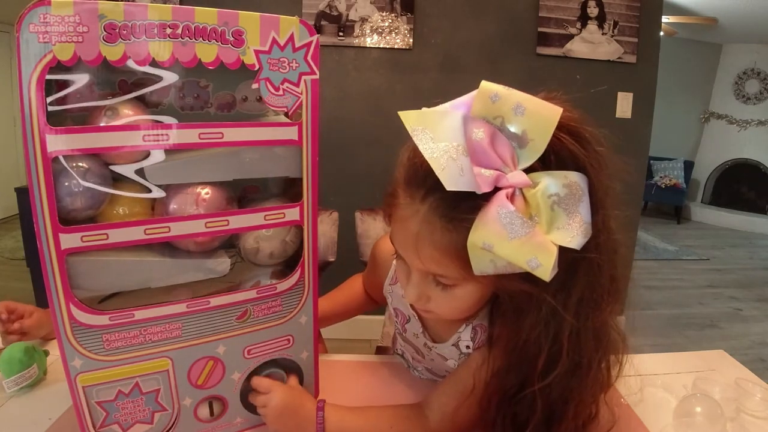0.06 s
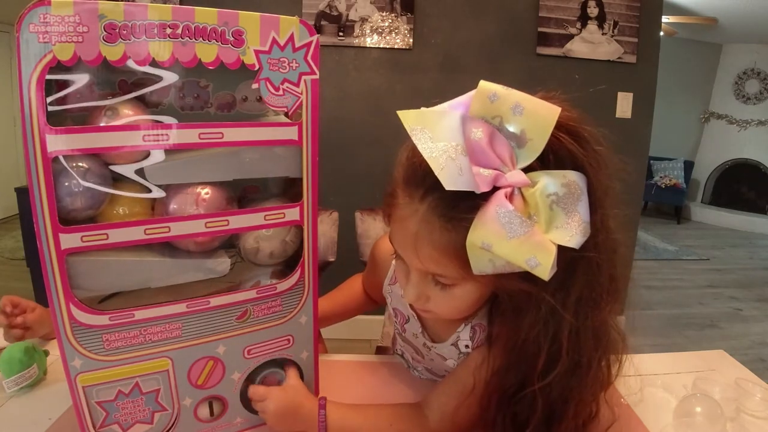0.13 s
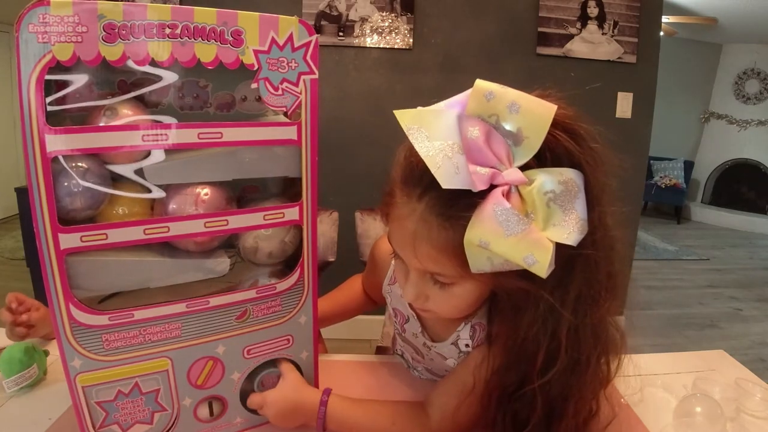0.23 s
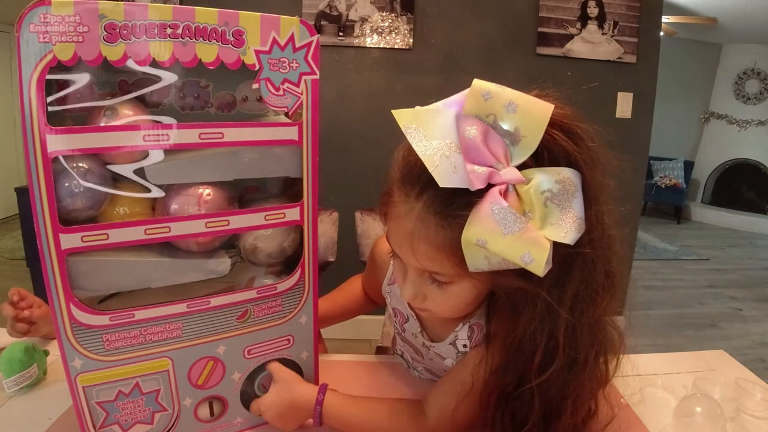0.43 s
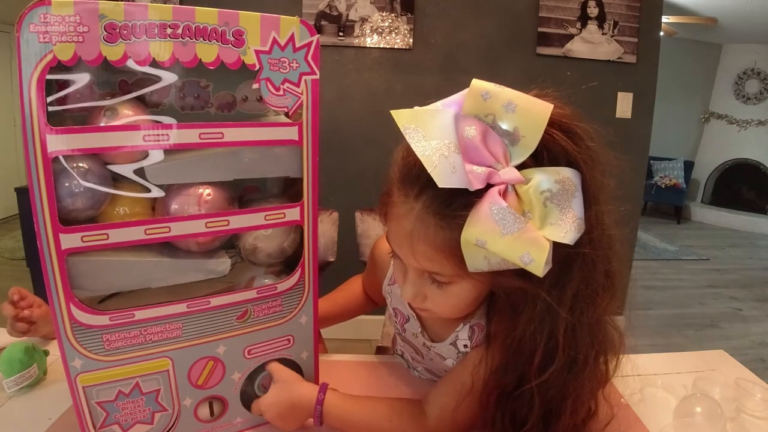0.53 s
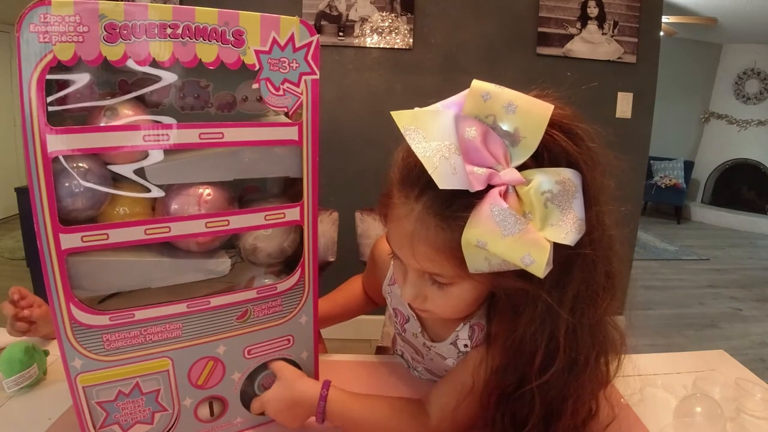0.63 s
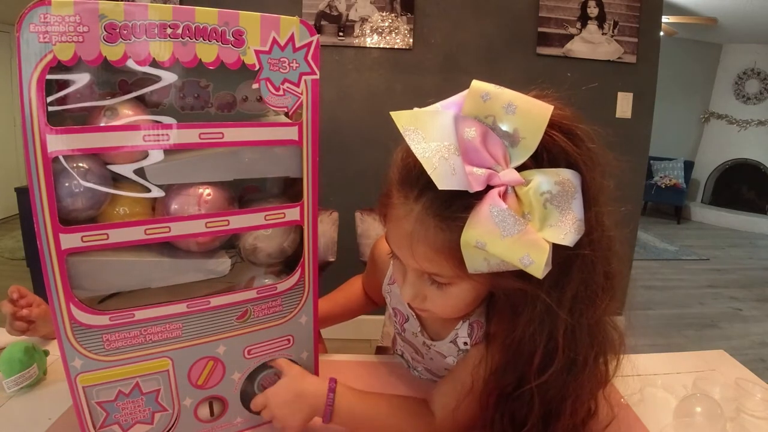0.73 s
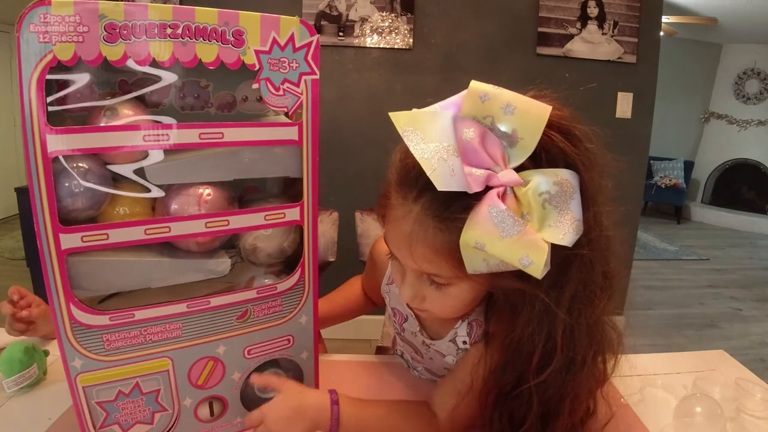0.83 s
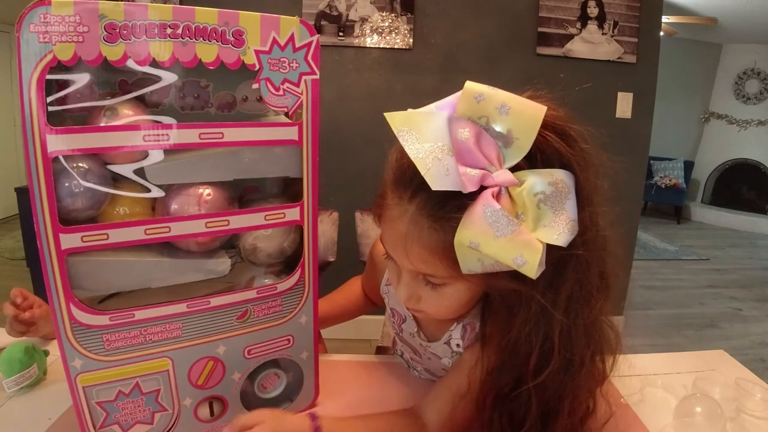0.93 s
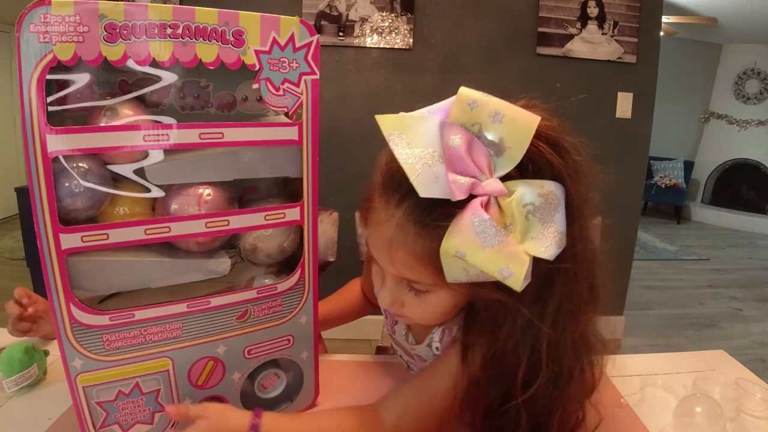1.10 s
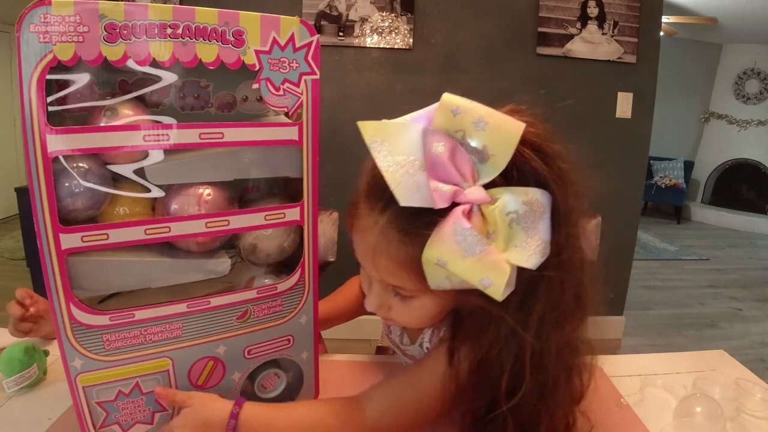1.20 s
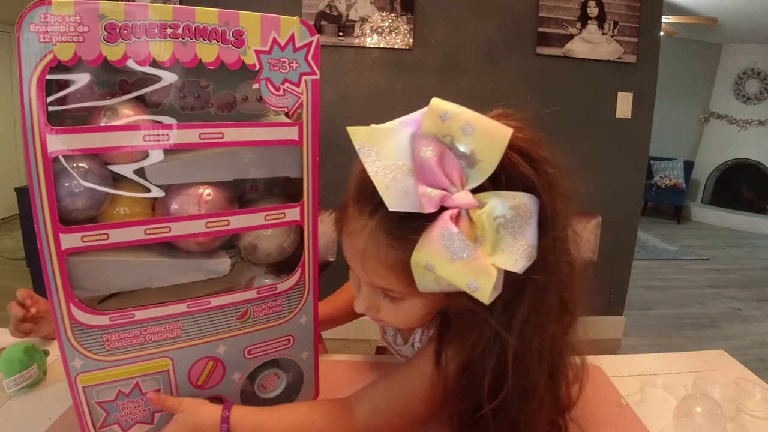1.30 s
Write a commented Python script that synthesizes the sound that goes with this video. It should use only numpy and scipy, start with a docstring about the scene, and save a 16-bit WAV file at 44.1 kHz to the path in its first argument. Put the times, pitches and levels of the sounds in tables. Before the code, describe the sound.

Hard plastic capsules clatter and knock inside a hollow toy dispenser as its dial turns

```python
"""A faint rub and roll over quiet air come first, then capsules knock, tumble and crack as a hand turns the dial
of a plastic and card toy dispenser on a table; the hollow cabinet thumps and rings. Blows and rolling grains
excite damped modes of cabinet and capsule shells; filtered noise gives the sliding hiss and the bright cracks.
A furnished room answers with a decaying diffuse tail; a close pair of microphones listens."""
import sys
import numpy as np
from scipy import signal
from scipy.fft import rfft, irfft
from scipy.io import wavfile

SR = 44100
rng = np.random.default_rng(int(sys.argv[2]) if len(sys.argv) > 2 else 0)


def boost(x):
    """Linear amplitude factor 10**(x/20) for a level x in decibels (scalar or array-like)."""
    u = np.asarray(x, float) / 20
    return 10 ** u


def dump_mix(stems):
    """Bounce the given channels to the path in sys.argv[1] as a 16-bit WAV at rate SR."""
    frames = np.atleast_2d(stems).T  # one column per channel
    limited = np.clip(frames, -1, 1)  # hard clip at full scale
    pcm = np.round(limited * 32767).astype(np.int16)
    wavfile.write(sys.argv[1], SR, pcm)


N = 59535   # samples

# Steady air of the room, spectral shape: pitch_hz, relative_density_db
AIR_SPECTRUM = [(20, -14.5), (38, -11), (75, -13), (330, -35.5), (560, -34), (750, -43.5), (3000, -50),
                (5000, -54.5), (8000, -60.5), (11000, -69)]
AIR_DB = -65   # rms level

# Rubbing and rolling over time: start_s, relative_level_db, hiss_against_it_db
TUMBLE_COURSE = [(0, -70, -12.5), (0.092, -63.5, -6.5), (.16, -53.5, -2.5), (0.233, -46, -2),
                 (0.258, -26.5, -30), (0.298, -67.5, 18), (0.319, -31.5, -17), (0.4, -38.5, -7.5),
                 (0.449, -32.5, -12.5), (0.526, -48.5, -13), (0.568, -43, -14.5), (0.668, -67, -10),
                 (0.773, -71, -16), (0.799, -49, -14.5), (0.859, -56.5, -5.5), (0.909, -52.5, -11.5),
                 (0.998, -70.5, -6.5), (1.082, -89, -3), (1.222, -76, -3.5), (1.244, -53.5, -10),
                 (1.35, -77, -9)]
# How the grains feed the modes: pitch_hz, gain_db
ROLL_DRIVE = [(58, -2.5), (138, -2), (205, -6.5), (400, -4.5), (1200, -13), (3000, -32.5), (9000, -49.5)]
# Sliding surfaces, spectral shape: pitch_hz, relative_density_db
HISS_SPECTRUM = [(900, -23), (1500, -0.5), (3100, -9.5), (4800, -12), (6500, -30), (9000, -46.5)]
GRAINS_PER_S, GRAIN_SPREAD_DB = 500, 4   # mean rate; scale of the uneven sizes
TUMBLE_DB = 2   # raises the ringing part of the tumble

# Blows, each favouring the modes near two pitches:
# start_s, relative_level_db, lower_pitch_hz, upper_pitch_hz, upper_against_lower_db
KNOCK_EVENTS = [(0.151, -45.5, 910, 3250, -0.5), (.186, -31, 244.6, 1000, -25),
                (0.242, -25, 350, 2350, -24), (0.2492, -12, 1172, 3200, -23),
                (0.2546, -16.5, 105, 600, -9.5), (0.273, -37.5, 142, 1200, -4),
                (0.3055, -11, 244.3, 740, -2.5), (.316, -17.5, 316, 740, -7), (0.3384, -23, 535, 1330, -4),
                (0.3379, -27.5, 904, 2760, -3.5), (0.372, -19.5, 327, 896, -10.5),
                (0.386, -32.5, 1330, 4750, -13), (0.3868, -13.5, 385.4, 750, -9),
                (0.404, -31.5, 340, 1800, -8), (0.42, -9.5, 126, 330, -32),
                (0.4345, -16.5, 730, 1340, -1.5), (0.4346, -39, 2300, 3150, 3.5),
                (0.445, -21, 134.2, 1200, -38), (0.453, -43, 1770, 3200, -15), (0.465, -24, 138, 1190, -45),
                (0.491, -30, 329, 691, 2), (0.507, -34.5, 334, 750, -8), (0.526, -32, 137, 900, -12),
                (0.54, -33.5, 138, 316, -1.5), (0.553, -40, 325, 2750, -6.5),
                (0.561, -30.5, 338, 750, -0.5), (0.572, -41, 137.4, 1200, -0.5),
                (0.597, -38, 142, 563, -7.5), (0.612, -37.5, 138, 330, -8.5),
                (0.752, -60.5, 1286, 1750, -7), (0.781, -47.5, 587, 1800, -15), (0.792, -31, 654, 1330, -6),
                (0.808, -36.5, 122, 1800, -12), (.822, -49, 591, 1330, -2.5), (0.844, -60, 1757, 2800, 2),
                (0.859, -42, 135.3, 1800, -20), (0.861, -64, 1768, 2900, 4),
                (0.886, -44.5, 488, 1100, -8.5), (0.902, -32.5, 605, 1330, -2.5),
                (0.904, -49.5, 2854, 4000, -5.5), (0.931, -51, 575, 1330, -12),
                (.976, -43.5, 593, 1330, -3.5), (1.2325, -35, 543, 1800, -9.5),
                (1.232, -52.5, 2900, 4400, -13.5), (1.2355, -41, 205, 1070, 2.5),
                (1.251, -46, 205, 570, -4.5), (1.294, -52, 574, 1100, -0.5)]
# Modes of cabinet and capsule shells: pitch_hz, relative_level_db, t60_s
BODY_MODES = [(57.7, 1.5, 0.15), (105, 2, 0.03), (138, 3, 0.072), (205, 7, 0.049), (266.8, 0, 0.053),
              (327.4, 0.5, 0.071), (415.3, 4, 0.046), (519.2, 1.5, 0.052), (577, 0, 0.07),
              (683, -6.5, 0.03), (717, 4.5, 0.015), (914.5, 1, 0.029), (1065, 1.5, 0.03),
              (1222, -0.5, 0.023), (1330, -1.5, 0.028), (1720, 6.5, 0.025), (2300, 2.5, 0.022),
              (2760, 1.5, 0.014), (3149, 0.5, 0.027), (4000, 5, 0.023), (4750, 10, 0.021)]
SPOT_OCTAVES, SKIRT_DB = 0.15, 11   # reach of a knock over the modes; fall per doubling of distance in pitch
CONTACT_CYCLES = 0.48   # time constant of a mode's swing up, in its own cycles
LINGER_DB, LINGER_TIMES = -16.5, 3.75   # loose shell's longer ring: level against the blow, t60 multiple

# Bright splinter of a knock
CRACK_DB, FIRM_DB = -57.5, -20   # burst peak before filtering, for a knock of the firm level
CRACK_S, CRACK_LOW_HZ, CRACK_HIGH_HZ = 0.021, 6200, 13300   # decay time constant; band
CRACK_GROWS, HARD_HZ = 2.01, 655   # dB per dB of knock; upper pitches below this splinter less

# Phase by which the left port leads the right for direct sound: pitch_hz, phase_rad
PORT_LEAD = [(100, 0), (1100, 0.23), (1600, 1), (2700, 0.62), (5000, 1.5), (8500, -3.5), (13000, 4.5)]
# Reverberation time: pitch_hz, t60_s
ROOM_DECAY = [(100, 0.21), (500, 0.38), (2000, 0.19), (8000, 0.085)]
# Room against direct sound: pitch_hz, level_db
ROOM_LEVEL = [(60, -6.5), (250, -10.5), (1000, -11), (4000, -5.5), (10000, -5)]
# Correlation of diffuse sound between the two channels: pitch_hz, correlation_ratio
DIFFUSE_LIKENESS = [(100, 1), (500, 0.99), (2000, 0.5), (6000, -0.1), (12000, -0.36)]
# Microphone response: pitch_hz, gain_db
MICROPHONE_RESPONSE = [(20, -15), (45, -0.5), (70, -4.5), (3100, -2), (3500, -5), (4800, -8.5), (5300, -13),
                       (7400, -11), (8800, 1), (10500, -18.5), (13000, -27.5)]


def at_hz(points, hz):
    """A spectrum is interpolated linearly over logarithmic frequency."""
    points = np.array(points)
    return np.interp(np.log(hz), np.log(points[:, 0]), points[:, 1])


def rms_one(x):
    """Dividing by the root mean square sets the rms to 1."""
    return x / np.sqrt(np.mean(x ** 2) + 1e-20)


def bin_hz(length):
    """Discrete Fourier bins lie SR / length apart; the lowest is held at 1 Hz."""
    return np.maximum(np.arange(length // 2 + 1) * SR / length, 1)


def diffuse(length):
    """A diffuse field: weighted mid and side noise give stereo spectra with a set correlation."""
    hz = bin_hz(length)
    mid, side = rfft(rng.standard_normal((2, length)))
    alike = np.clip(at_hz(DIFFUSE_LIKENESS, hz), -1, 1)
    common = np.sqrt(1 + alike) * mid
    opposed = np.sqrt(1 - alike) * side * [[1], [-1]]
    return hz, (common + opposed) / np.sqrt(2)


def ring(force, hz, t60):
    """Damped resonance: a yielding contact swings a sine up to height about 1, then it dies away."""
    turn = np.exp(1j * 2 * np.pi * hz / SR)
    decay = boost(-60 / (t60 * SR))
    soft = np.exp(-hz / (CONTACT_CYCLES * SR))
    swing = signal.lfilter([1 - soft], [1, -soft * turn], force + 1e-18)
    return signal.lfilter([1], [1, -decay * turn], swing).imag


def room_tone():
    """Stationary diffuse noise: the faint steady air."""
    hz, noise = diffuse(N)
    return boost(AIR_DB) * rms_one(irfft(noise * boost(at_hz(AIR_SPECTRUM, hz)), N))


def grains():
    """A random impulse train: dense tiny contacts of uneven size and either sign, rms 1."""
    sizes = boost(GRAIN_SPREAD_DB * np.minimum(rng.exponential(1, N), 5))
    signs = rng.choice([-1, 1], N)
    present = rng.random(N) < GRAINS_PER_S / SR
    return rms_one(sizes * signs * present)


def tumble():
    """Random excitation: rolling grains feed the modes; sliding surfaces add ticks and a wide smooth hiss."""
    start_s, level_db, hiss_db = np.transpose(TUMBLE_COURSE)
    t = np.arange(N) / SR
    level_db = np.interp(t, start_s, level_db)
    hiss_db = np.interp(t, start_s, hiss_db)
    body = np.zeros(N)
    for mode_hz, _, t60 in BODY_MODES:
        # the root evens out the greater energy of a long ring
        gain = boost(at_hz(ROLL_DRIVE, mode_hz)) / np.sqrt(t60 * SR / 28)
        body += gain * ring(grains() * boost(level_db + TUMBLE_DB), mode_hz, t60)
    hz, noise = diffuse(N)
    colour = boost(at_hz(HISS_SPECTRUM, hz))
    course = boost(level_db + hiss_db - 2.5)   # ticks and hiss share it
    ticks = course * rms_one(irfft(rfft(grains()) * colour, N))
    hiss = course * rms_one(irfft(noise * colour, N))
    return body + ticks, hiss


def nearness(mode_hz, spot_hz):
    """Selective excitation: a blow drives a mode less the farther it lies in pitch."""
    distance = np.log2(mode_hz / spot_hz) / SPOT_OCTAVES
    return boost(-SKIRT_DB / 2 * np.log2(1 + distance ** 2))


def knocks():
    """Modal excitation: each knock rings all modes, most those near its two pitches; a faint long ring follows."""
    start_s, level_db, lower_hz, upper_hz, upper_db = np.transpose(KNOCK_EVENTS)
    at = (start_s * SR).astype(int)
    scatter_db = rng.normal(0, 1, (len(at), len(BODY_MODES)))
    out = np.zeros(N)
    for k, (hz, mode_db, t60) in enumerate(BODY_MODES):
        drive = nearness(hz, lower_hz) + boost(upper_db) * nearness(hz, upper_hz)
        force = np.zeros(N)
        force[at] = boost(level_db + mode_db + scatter_db[:, k]) * drive
        out += ring(force, hz, t60)
        out += boost(LINGER_DB) * ring(force, hz, LINGER_TIMES * t60)
    return out


def cracks():
    """Nonlinear contact: hard, strong knocks splinter into a short bright hiss that outgrows the blow."""
    start_s, level_db, _, upper_hz, _ = np.transpose(KNOCK_EVENTS)
    hardness = np.minimum(upper_hz / HARD_HZ, 1) ** 2
    burst = np.zeros(N)
    burst[(start_s * SR).astype(int)] = boost(CRACK_GROWS * (level_db - FIRM_DB) + CRACK_DB) * hardness
    envelope = signal.lfilter([1], [1, -np.exp(-1 / (CRACK_S * SR))], burst + 1e-18)
    band = signal.butter(2, [CRACK_LOW_HZ, CRACK_HIGH_HZ], "band", fs=SR, output="sos")
    return signal.sosfilt(band, envelope * rng.standard_normal(N))


def ports(x):
    """Interchannel phase: two ports a little apart hear the direct sound with a phase set by pitch."""
    half_lead = 0.5 * at_hz(PORT_LEAD, bin_hz(N))
    return irfft(rfft(x) * np.exp(1j * half_lead * [[1], [-1]]), N)


def room(x):
    """Reverberation: a diffuse tail of octave bands of stereo noise, each dying at its own pace."""
    length = 2 ** 15
    hz, noise = diffuse(length)
    t = np.arange(length) / SR
    onset = np.clip(t / 0.0034, 0, 1)
    tail = 0
    for centre in 62.5 * 2. ** np.arange(9):
        band = np.cos(np.pi / 2 * np.clip(np.log2(hz / centre), -1, 1)) ** 2
        t60 = at_hz(ROOM_DECAY, centre)
        even_energy = np.sqrt(6 * np.log(10) / (t60 * SR))   # long and short decays carry alike
        fade = boost(-60 * t / t60) * onset * even_energy
        tail = tail + boost(at_hz(ROOM_LEVEL, centre)) * fade * irfft(noise * band, length)
    return signal.fftconvolve(x[None], tail, axes=1)[:, :N]


def scene():
    """Superposition: direct sound of the dispenser, its room, and the already diffuse hiss."""
    rolling, hiss = tumble()
    toy = knocks() + cracks() + rolling
    return ports(toy) + room(toy) + hiss


def band_limit(x):
    """A steep low-pass at the top of the band."""
    return signal.sosfilt(signal.butter(12, 15000, fs=SR, output="sos"), x)


def record(dry):
    """Linear filtering: the microphones colour the sound, over a floor of air and electronics."""
    coloured = irfft(rfft(dry) * boost(at_hz(MICROPHONE_RESPONSE, bin_hz(N))), N)
    mix = coloured + room_tone()
    return band_limit(mix)


dry = scene()
out = record(dry)
dump_mix(out)
```